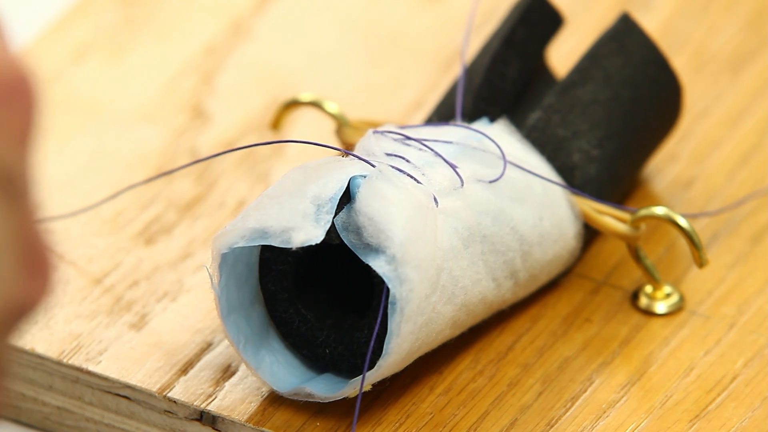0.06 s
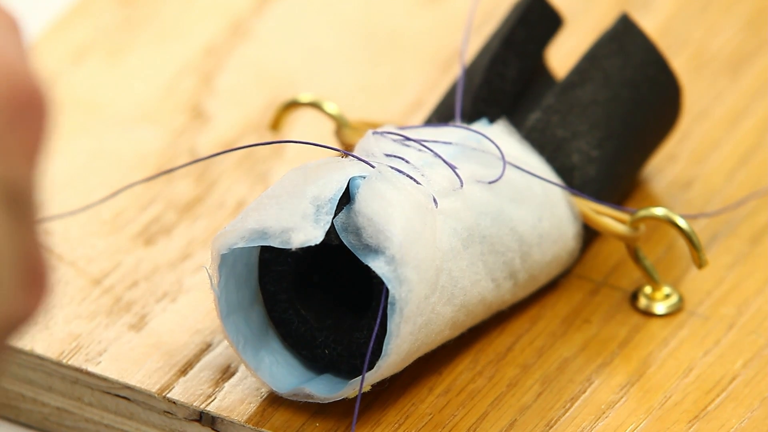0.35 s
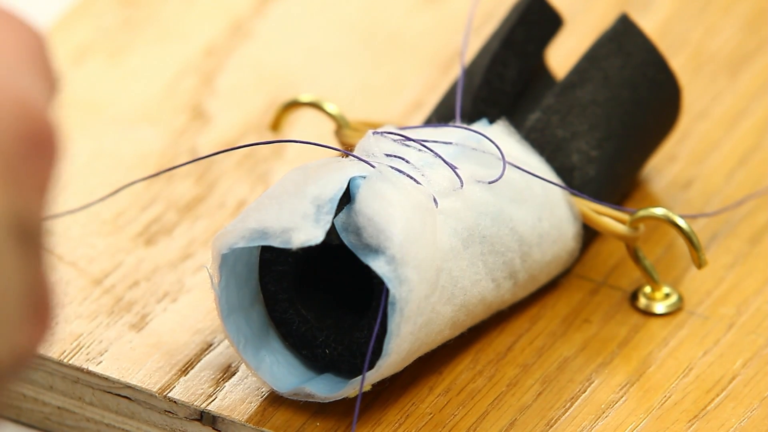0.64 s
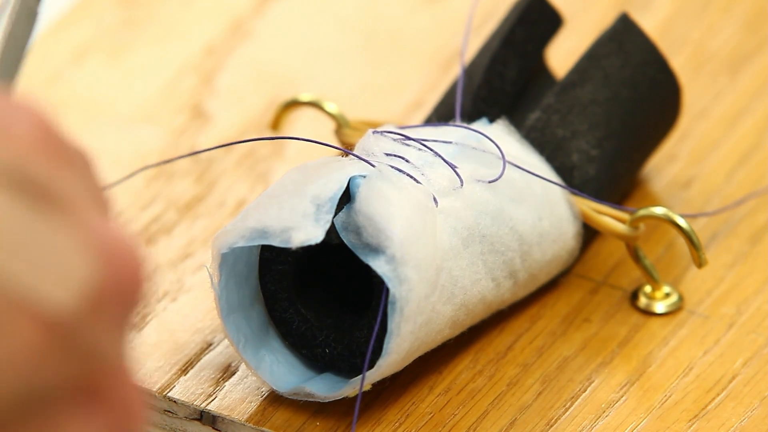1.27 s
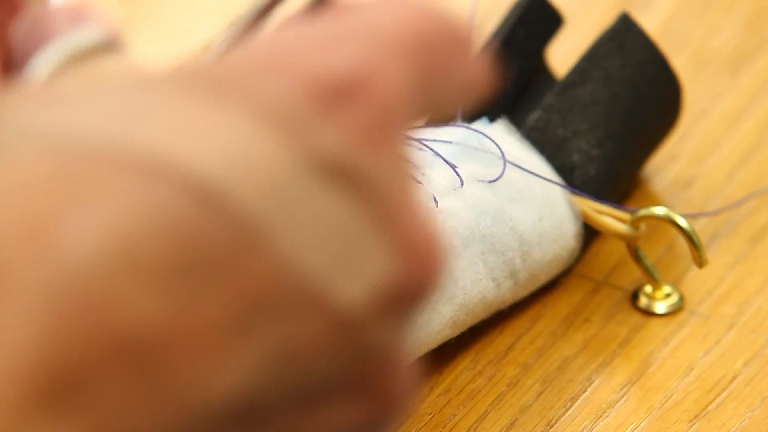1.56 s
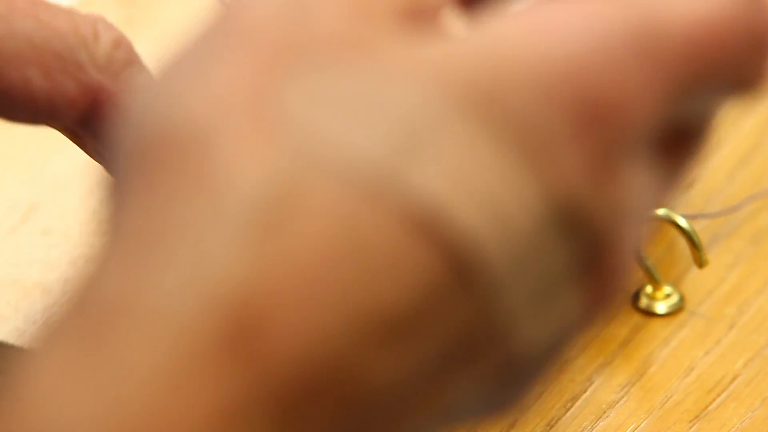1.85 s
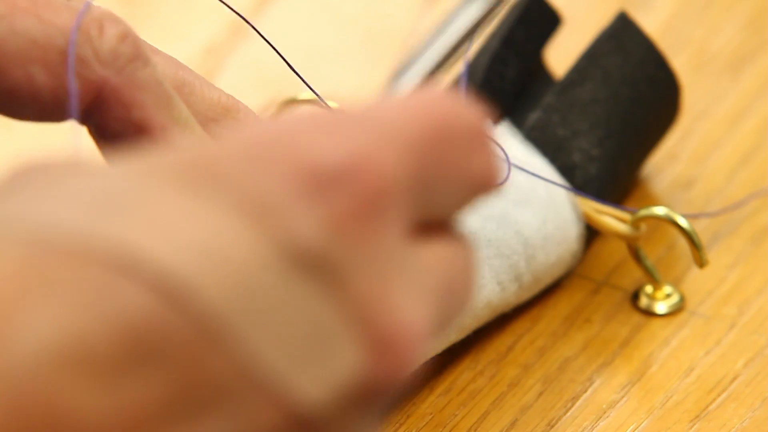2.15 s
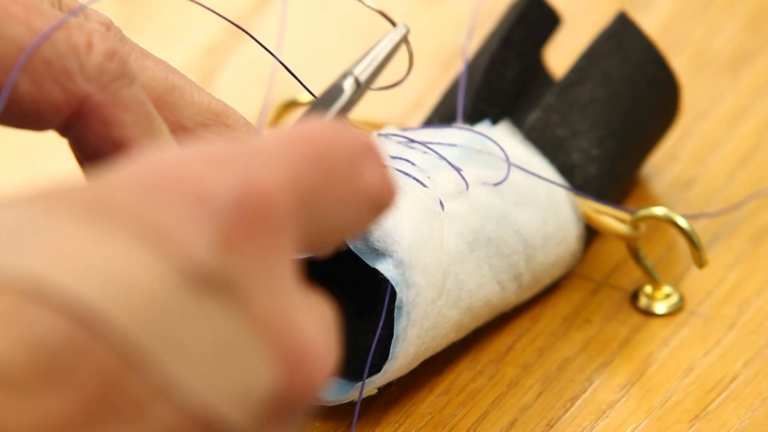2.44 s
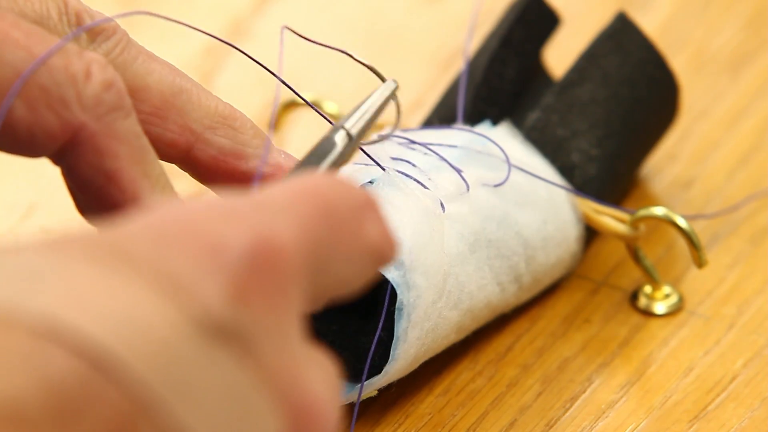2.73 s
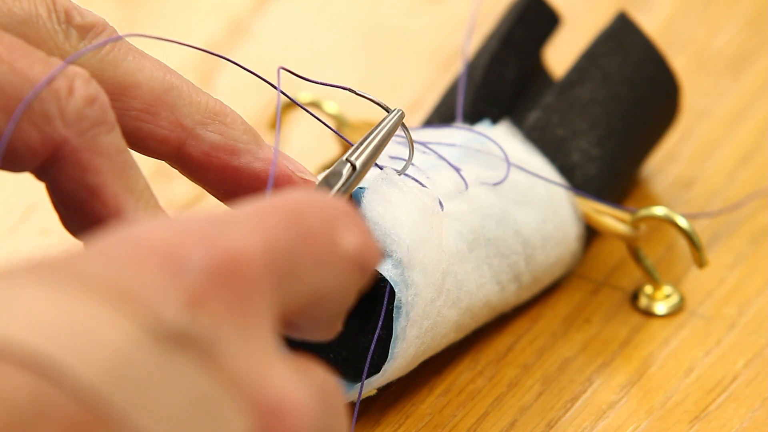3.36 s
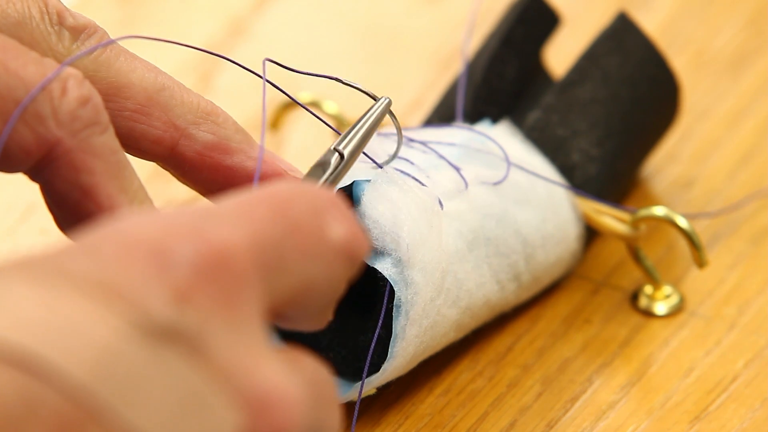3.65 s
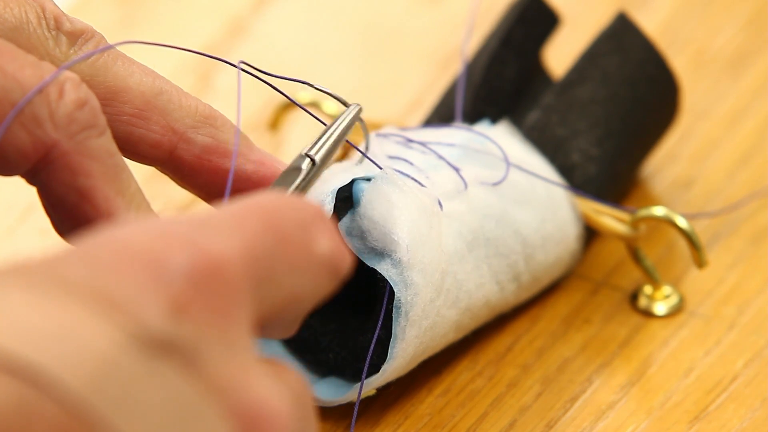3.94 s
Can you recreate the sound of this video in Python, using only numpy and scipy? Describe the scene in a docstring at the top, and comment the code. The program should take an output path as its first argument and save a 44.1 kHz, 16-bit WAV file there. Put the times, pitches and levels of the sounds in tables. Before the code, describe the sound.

A steel needle holder's ratchet snaps sharply twice, close by, at about 1.3 and 1.4 seconds, after a few faint thread ticks. Its loose arms clink brightly around 1.5 seconds, and the hand gives a soft knock at 1.6. Tiny ticks lead to a faint steel ring at 2 seconds. Afterwards, fingers and thread barely rustle until about 3.7. Low ventilation hums throughout in the small, quiet room.

```python
"""A steel needle holder, handled close by: its ratchet snaps twice as teeth slip over their edges.
The loose arms clink together, and the steel rings once more as the hand turns it.
Fingers and thread rustle and tick faintly; the hand gives one soft knock.
Behind it, a quiet small room with low ventilation rumble and wavering fan tones."""
import sys
import numpy as np
from scipy import signal
from scipy.fft import rfft, irfft
from scipy.io import wavfile

SR = 44100
rng = np.random.default_rng(int(sys.argv[2]) if len(sys.argv) > 2 else 0)


def master(y):
    """Save y as 16-bit WAV."""
    cut = np.clip(np.atleast_2d(y).T, -1, 1)
    pcm = np.round(cut * 32767)  # scale
    wavfile.write(sys.argv[1], SR, pcm.astype(np.int16))


N = 176400
TIME_S = np.arange(N) / SR
EVENT_N = SR // 2
EVENT_S = np.arange(EVENT_N) / SR

# room air: f/Hz, level/dB
AIR_SPECTRUM = [(20, -43), (38, -3.5), (55, -7.5), (72, -12), (88, 0.5), (108, -1.5), (135, 0), (160, -11),
                (225, -4), (275, -14.5), (360, -12), (435, -21.5), (490, -18), (540, -22), (700, -24.5),
                (1000, -32), (2000, -37.5), (4000, -44.5), (8000, -46.5), (15400, -44.5), (16200, -84)]
# fan and motor tones: f/Hz, rms level/dB, unsteadiness/0..1
FAN_TONES = [(58.6, -48, .7), (94.5, -42, .9), (120, -47.5, .8), (134, -48, 1), (212, -50, 1),
             (240, -49, .7), (258.9, -38.3, .2), (297, -50.3, .6), (339.5, -52.5, .85), (402, -58, .95),
             (497, -61, .95)]
# room reflections: f/Hz, level/dB
ROOM_SPECTRUM = [(300, -4), (1500, -4), (2300, -5), (3000, -2.5), (4300, -9), (5400, -9), (7500, -3),
                 (9200, -1), (10800, 4), (13500, 2), (15500, -5)]
# finger and thread slides: centre t/s, half length/s, rub level/dB, hiss level/dB
SLIDES = [(1.0, .04, -62, -57), (1.92, .065, -62, -56), (1.971, .011, -48.5, -48.5), (2.12, .06, -68, -58),
          (2.42, .05, -70, -63), (3.145, .025, -68, -55), (3.49, .04, -72, -61), (3.6, .04, -70, -60),
          (3.69, .015, -72, -61)]
# dull and bright friction: f/Hz, level/dB
DULL_RUB_SPECTRUM = [(400, -12), (1800, 0), (3500, -7), (6000, -8), (16000, -22)]
BRIGHT_HISS_SPECTRUM = [(2000, -26), (6000, -15), (10000, -4), (13300, 0), (15300, -3), (16300, -18)]
# needle and thread ticks: t/s, level/dB, centre f/Hz
NEEDLE_TICKS = [(.4048, -38, 6000), (.9012, -29, 11500), (.976, -37, 5500), (1.8195, -30, 5000),
                (1.8615, -32, 12500), (1.8822, -25.5, 13000), (1.974, -28, 1900), (2.159, -39, 13000),
                (2.165, -39, 11000)]
# hand knock: t/s, level/dB
HAND_KNOCKS = [(1.6282, -23)]
# knock modes: f/Hz, level/dB, T60/s
HAND_KNOCK_MODES = [(410, -6, .03), (520, -7, .022), (760, 0, .014), (870, -4, .016), (1550, -14, .012),
                    (2150, -17, .012)]
# steel contacts: t/s, ring level/dB, clash level/dB, shimmer level/dB, grip (0 loose, 1 turned)
ARM_CONTACTS = [(1.4741, -23.5, -3, -23.5, 0), (1.4805, -31, -7.5, -26, 0), (1.4828, -37, -12, -34, 0),
                (1.487, -37, -15, -33, 0), (1.5432, -33, -9, -31, 0), (1.5477, -38, -13, -38, 0),
                (1.5818, -39, -21, -44, 0), (2.0183, -28, -22, -28, 1), (2.0236, -27.5, -19.5, -28, 1)]
# arm modes, loose and turned in the hand: f/Hz, level/dB, T60/s
LOOSE_ARM_MODES = [(5600, -11, .055), (6250, -8, .035), (7020, -8, .04), (8952, -10, .055),
                   (10690, -4, .055), (11210, -8, .07), (11470, -8, .07), (12400, -8, .075),
                   (13182, -5, .07), (14340, -8, .065), (14670, -4, .05), (15230, 0, .05), (15415, 2, .055),
                   (15545, -2, .05)]
TURNED_ARM_MODES = [(2020, -16, .06), (2930, -16, .05), (4150, -14, .04), (5600, -12, .05),
                    (6380, -14, .05), (7620, -12, .05), (9130, -3, .08), (9875, -8, .06), (10313, 1, .07),
                    (11234, -3, .075), (12122, -9, .065), (12570, -5, .09), (13396, -3, .065),
                    (13798, 0, .07), (13925, -5, .07), (15040, -2, .075)]
# first hard contact: f/Hz, level/dB
CLASH_SPECTRUM = [(500, -22), (2000, -15), (4000, -14), (6200, -2), (8200, -1), (10500, 8), (11500, 7),
                  (12800, 2), (14200, 8), (15400, 13), (16500, -8)]
# dense upper modes ringing on: f/Hz, level/dB
SHIMMER_SPECTRUM = [(500, -33), (2000, -26), (4300, -9), (5700, 4), (8200, 2), (10800, 7.5), (13000, -8),
                    (15300, -9), (16200, -20)]
# tooth slips: t/s, level/dB, tooth (0 or 1), relative grit level/dB
TOOTH_SLIPS = [(1.2755, -21.5, 0, -5), (1.2835, -2, 0, -2), (1.3944, 1, 1, -11.5)]
# clamped ratchet modes: f/Hz, T60/s, tooth 0 level/dB, tooth 1 level/dB
RATCHET_MODES = [(1120, .0065, -11, -17), (1750, .004, -20, -34), (2520, .005, 3, -8),
                 (3050, .004, -7, -28), (4030, .0065, -18, -4), (4520, .005, -8, -3), (5330, .007, -19, -6),
                 (6600, .005, -15, -18), (7960, .005, -17, -13), (9200, .006, 1, -22),
                 (10300, .005, -6, -11), (11950, .0045, 1, -15), (13150, .005, -1, -11),
                 (14000, .004, -6, -18), (14700, .005, -16, -11), (15550, .005, -9, -13)]
# tooth scraping its edge: f/Hz, level/dB
GRIT_SPECTRUM = [(500, -25), (1000, -5), (3000, 0.5), (7000, -7), (12000, -0.5), (16000, -15)]

CONTACT_ATTACK_S = .00045


def from_db(db):
    """Decibels to gain."""
    return 10 ** (np.asarray(db) / 20)


def noise(spectrum, size=EVENT_N):
    """Unit-rms noise shaped by rows of f/Hz, level/dB."""
    hz, db = np.transpose(spectrum)
    bins_hz = np.arange(size // 2 + 1) * SR / size
    gain = from_db(np.interp(np.log(bins_hz + 1), np.log(hz), db))
    x = irfft(rfft(rng.standard_normal(size)) * gain, size)
    return x / x.std()


def drift(rate_hz):
    """Low-passed random wander, unit spread."""
    bins_hz = np.arange(N // 2 + 1) * SR / N
    x = irfft(rfft(rng.standard_normal(N)) / (1 + (bins_hz / rate_hz) ** 2), N)
    return x / x.std()


def strike(attack_s, t60_s):
    """Envelope: fast rise, free decay."""
    return (1 - np.exp(-EVENT_S / attack_s)) * np.exp(-np.log(1000) * EVENT_S / t60_s)


def ring(modes, attack_s):
    """Damped sines of alternating sign from rows of f/Hz, level/dB, T60/s."""
    return sum((-1) ** k * from_db(db) * strike(attack_s, t60_s) * np.sin(2 * np.pi * hz * EVENT_S)
               for k, (hz, db, t60_s) in enumerate(modes))


def add(track, t_s, sound):
    """Mix sound into track at t_s."""
    start = int(t_s * SR)
    track[start:start + len(sound)] += sound[:N - start]


def ventilation(air_db=-36.5, wander_hz=4):
    """Air rumble plus fan tones wavering in level and phase."""
    out = from_db(air_db) * noise(AIR_SPECTRUM, N)
    for hz, db, unsteadiness in FAN_TONES:
        steady = np.sqrt(2 * (1 - unsteadiness ** 2))
        wander = unsteadiness * (drift(wander_hz) + 1j * drift(wander_hz))
        carrier = np.exp(2j * np.pi * (hz * TIME_S + rng.random()))
        out += from_db(db) * np.real((steady + wander) * carrier)
    return out


def room(x, level_db=-17):
    """Diffuse reflections of a small furnished room."""
    response = noise(ROOM_SPECTRUM) * strike(attack_s=.004, t60_s=.215)
    return from_db(level_db) * signal.fftconvolve(x, response / np.linalg.norm(response))[:N]


def rustle(roughness_db=3.5, grain_hz=220):
    """Fingers and thread slide: swells of rub and hiss, grainy from friction."""
    rub, hiss = noise(DULL_RUB_SPECTRUM, N), noise(BRIGHT_HISS_SPECTRUM, N)
    out = np.zeros(N)
    for t_s, half_s, rub_db, hiss_db in SLIDES:
        swell = np.exp(-((TIME_S - t_s) / half_s) ** 2)
        out += swell * (from_db(rub_db) * rub + from_db(hiss_db) * hiss)
    return out * from_db(roughness_db * drift(grain_hz))


def ticks(skirt_db=-16):
    """Needle and thread tick: tiny broadband bursts."""
    out = np.zeros(N)
    for t_s, db, hz in NEEDLE_TICKS:
        band = [(hz / 4, skirt_db), (hz, 0), (hz * 4, skirt_db)]
        add(out, t_s, from_db(db) * noise(band) * strike(CONTACT_ATTACK_S, t60_s=.003))
    return out


def knock():
    """The hand knocks softly: low, damped modes."""
    out = np.zeros(N)
    for t_s, db in HAND_KNOCKS:
        add(out, t_s, from_db(db) * ring(HAND_KNOCK_MODES, attack_s=.0003))
    return out


def steel_arms(modes, detune=.006, second_arm_db=-5):
    """Both arms ring, the second weaker and slightly detuned."""
    second_arm = [(hz * (1 + detune * rng.standard_normal()), db + second_arm_db, t60_s)
                  for hz, db, t60_s in modes]
    return ring(modes, CONTACT_ATTACK_S) + ring(second_arm, CONTACT_ATTACK_S)


def clinks():
    """The free arms touch and bounce: bright clash, then ringing steel."""
    out = np.zeros(N)
    for t_s, ring_db, clash_db, shimmer_db, turned in ARM_CONTACTS:
        ringing = from_db(ring_db) * steel_arms(TURNED_ARM_MODES if turned else LOOSE_ARM_MODES)
        clash = from_db(clash_db) * noise(CLASH_SPECTRUM) * strike(CONTACT_ATTACK_S, t60_s=.0085)
        shimmer = from_db(shimmer_db) * noise(SHIMMER_SPECTRUM) * strike(CONTACT_ATTACK_S, t60_s=.058)
        add(out, t_s, ringing + clash + shimmer)
    return out


def ratchet(attack_s=.0004, highpass_hz=900):
    """A tooth slips over its edge: gritty crack, heavily damped ring; too small to radiate bass."""
    out = np.zeros(N)
    for t_s, db, tooth, grit_db in TOOTH_SLIPS:
        modes = [(hz, db1 if tooth else db0, t60_s) for hz, t60_s, db0, db1 in RATCHET_MODES]
        grit = from_db(grit_db) * noise(GRIT_SPECTRUM) * strike(attack_s, t60_s=.007)
        add(out, t_s, from_db(db) * (ring(modes, attack_s) + grit))
    highpass = signal.butter(4, highpass_hz, "high", fs=SR, output="sos")
    return signal.sosfilt(highpass, out + 1e-18)  # offset avoids denormals


def scene():
    """Tool and hands in the humming room, mono."""
    impacts = ratchet() + clinks() + ticks() + knock()
    return (impacts + room(impacts) + rustle() + ventilation())[None]


def record(dry):
    """Clip at full scale, then cut the top treble."""
    stop_db, stop_hz = 60, 16800
    lowpass = signal.cheby2(16, stop_db, stop_hz, fs=SR, output="sos")
    return signal.sosfilt(lowpass, np.clip(dry, -1, 1))


dry = scene()
out = record(dry)
master(out)
```